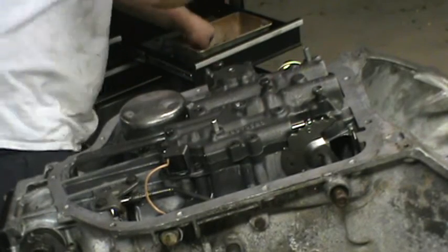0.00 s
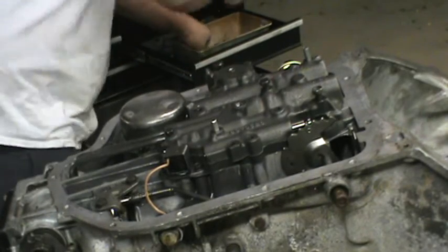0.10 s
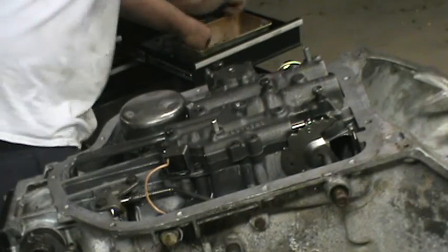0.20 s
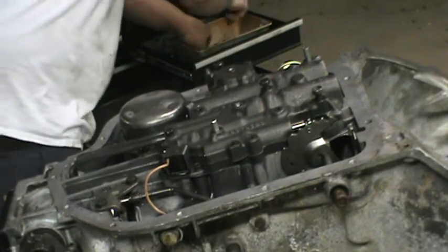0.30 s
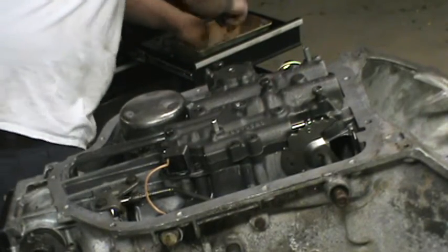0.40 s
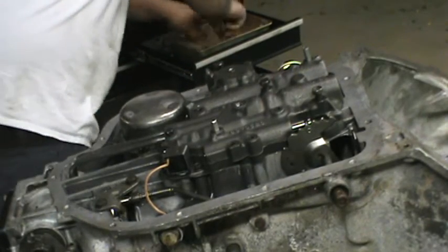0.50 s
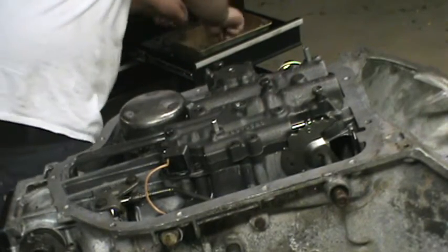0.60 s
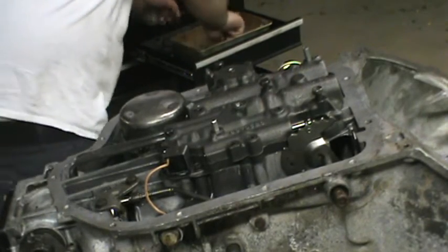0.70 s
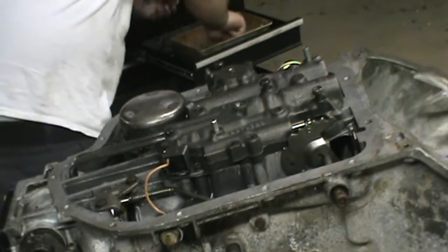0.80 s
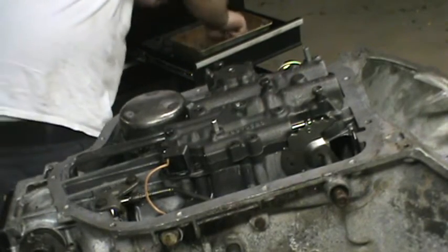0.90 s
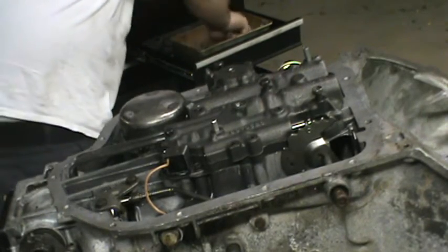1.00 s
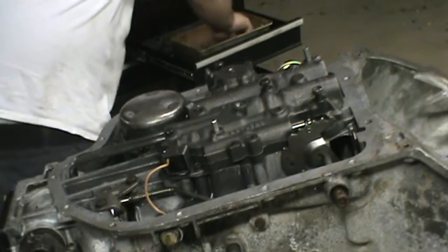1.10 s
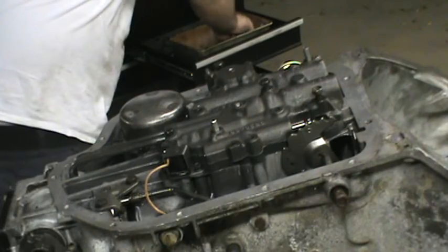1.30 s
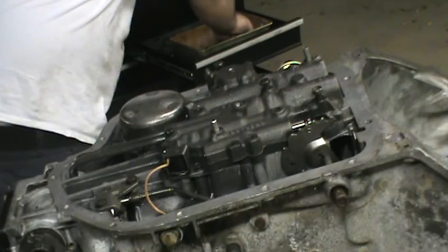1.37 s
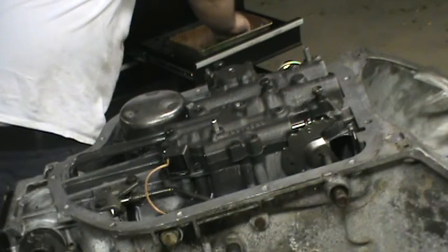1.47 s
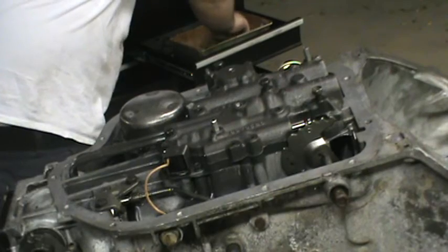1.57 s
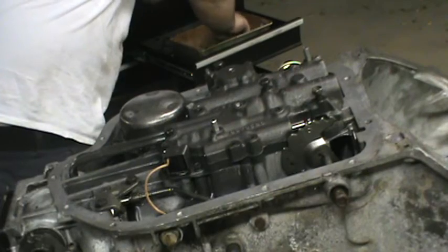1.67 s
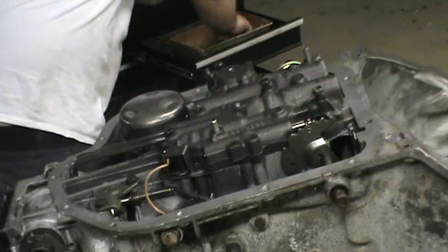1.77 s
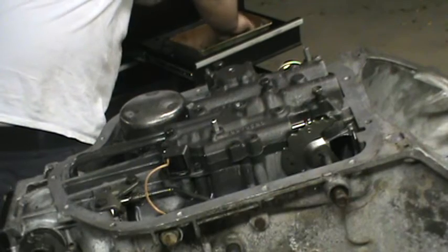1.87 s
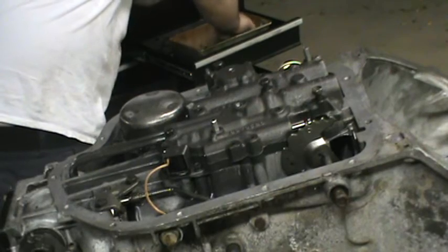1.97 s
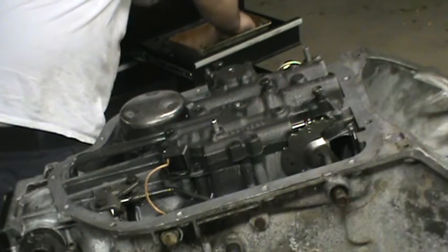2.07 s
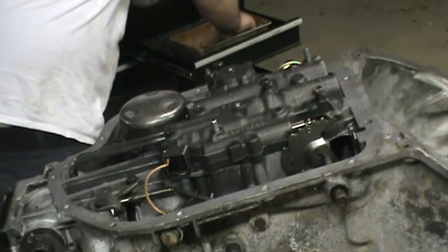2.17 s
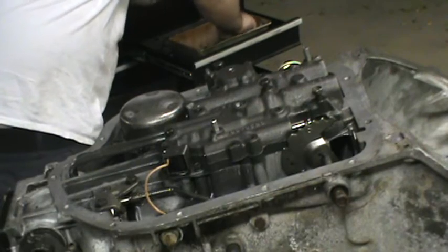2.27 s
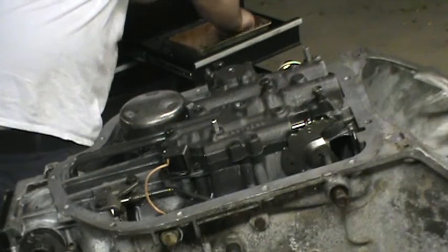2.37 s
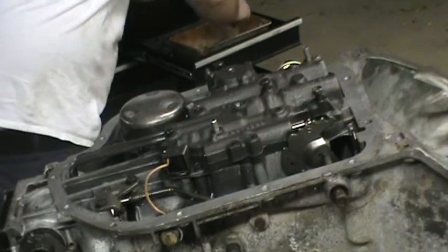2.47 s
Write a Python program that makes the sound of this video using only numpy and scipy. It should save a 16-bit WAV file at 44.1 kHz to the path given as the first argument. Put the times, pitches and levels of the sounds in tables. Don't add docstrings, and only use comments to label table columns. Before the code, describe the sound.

A hand stirs loose steel bolts in a shallow tray: uneven bursts of scraping, bright clinks and hollow floor knocks, with brief high rings, heard about two metres away in a small echoing workshop with faint hiss.

```python
import sys
import numpy as np
from scipy import signal
from scipy.fft import rfft, irfft
from scipy.io import wavfile
from scipy.ndimage import uniform_filter1d

SR = 44100
rng = np.random.default_rng(int(sys.argv[2]) if len(sys.argv) > 2 else 0)


def digitize_waveform(pressure):
    field = np.atleast_2d(pressure).T
    bounded = np.clip(field, -1, 1)
    quanta = np.round(bounded * 32767).astype(np.int16)
    wavfile.write(sys.argv[1], SR, quanta)


def natural_amplitude(level_db):
    exponent = np.asarray(level_db, float) / 20
    return 10 ** exponent


N = 112455

# mode_hz [Hz], level_db [dB], t60_s [s]
TRAY_MODES = [(320, -14, .06), (390, -4, .16), (603, -13, .1), (665, -3, .13), (770, -6, .1), (880, 0, .14),
              (968, -6, .1), (1030, -5, .1), (1180, -4, .11), (1295, -5, .1), (1460, -7, .09),
              (1590, -7, .09), (1800, -9, .06), (2200, -9, .07)]


def evened(x):
    return x / np.sqrt(np.mean(x ** 2) + 1e-20)


def read(points, hz):
    f, value = np.transpose(points)
    return np.interp(np.log(hz + 1), np.log(f + 1), value)


def add(mix, start_s, sound):
    part = mix[round(start_s * SR):][:len(sound)]
    part += sound[:len(part)]


def colour(x, points):
    size = x.shape[-1]
    gain = natural_amplitude(read(points, np.fft.rfftfreq(size, 1 / SR)))
    return irfft(rfft(x) * gain, size)


def band(x, lo_hz, hi_hz):
    sos = signal.butter(2, [lo_hz, hi_hz], "band", fs=SR, output="sos")
    return signal.sosfilt(sos, x)


def tray(hz, spread_db):
    focus_db = -8.5
    mode_hz, level_db, t60_s = np.transpose(TRAY_MODES)[:, :, None]
    t = np.arange(6000) / SR
    away_oct = abs(np.log2(mode_hz / hz))
    level_db = level_db + focus_db * (np.minimum(10 * away_oct, 1) + 0.28 * away_oct) + spread_db[:, None]
    modes = natural_amplitude(level_db - 60 * t / t60_s) * np.sin(2 * np.pi * mode_hz * t)
    return modes.sum(0)


def stir():
    # start_s [s], length_s [s], scrape_db [dB], tray_db [dB]
    strokes = [(0, 0.1, -60.5, -51.5), (0.214, 0.13, -56.5, -55.5), (0.321, 0.1, -50, -45.5),
               (0.423, 0.15, -63, -56), (0.668, 0.18, -46.5, -53), (0.839, 0.11, -46.5, -46),
               (0.958, 0.053, -52.5, -47), (1.043, 0.14, -52.5, -52.5), (1.217, 0.13, -54, -49.5),
               (1.35, 0.22, -64.5, -60.5), (1.563, 0.13, -60, -50.5), (1.647, 0.065, -54, -51),
               (1.726, 0.23, -55.5, -54), (1.864, 0.071, -46.5, -67), (1.964, 0.076, -53, -50.5),
               (2.055, 0.22, -63.5, -57.5), (2.172, 0.078, -45.5, -58), (2.227, 0.11, -54, -54)]
    # freq_hz [Hz], density_db [dB per Hz]
    scrape_spectrum = [(480, -10), (680, 1), (900, -6), (1140, -2.5), (3020, -7), (6740, -14),
                       (10300, -9.5), (15800, -19.5)]
    rise_s, fade_s, sag_db = 0.02, 0.026, -3.5
    grains_per_s, grain_spread_db, grain_t60_s = 5000, 2.5, 0.012
    drum_t60_s = 0.29

    t, power = np.arange(N) / SR, np.zeros((2, N))
    for start_s, length_s, scrape_db, tray_db in strokes:
        rise = np.clip((t - start_s) / rise_s, 0, 1)
        fade = np.exp(-np.maximum(t - start_s - length_s, 0) / fade_s)
        sag = natural_amplitude(sag_db * np.clip((t - start_s) / length_s, 0, 1))
        power += (rise * fade * sag * natural_amplitude(np.array([[scrape_db], [tray_db]]))) ** 2

    size = natural_amplitude(grain_spread_db * np.minimum(rng.exponential(1, (2, N)), 4))
    size = size * (rng.random((2, N)) < grains_per_s / SR)
    size = size * rng.standard_normal((2, N))

    grain = natural_amplitude(-60 * np.arange(400) / SR / grain_t60_s)
    envelope = np.sqrt(abs(signal.oaconvolve(size[0] ** 2, grain ** 2)[:N]))
    scrape = colour(envelope * rng.standard_normal(N), scrape_spectrum)
    scrape = band(scrape, 400, 17000) / np.std(band(scrape, 2500, 7000))

    body = tray(974, np.zeros(len(TRAY_MODES))) * natural_amplitude(-60 * np.arange(6000) / SR / drum_t60_s)
    hits = evened(size[1]) * np.sqrt(power[1])
    drum = signal.oaconvolve(hits, body / np.linalg.norm(body))[:N]
    return np.sqrt(power[0]) * scrape + band(drum, 260, 12000)


def air():
    # freq_hz [Hz], density_db [dB per Hz]
    air_spectrum = [(12, -6), (24, 5), (36, -2.5), (65, -0.5), (187, -4), (588, -4.5), (2810, -14),
                    (8600, -17), (15900, -17)]
    # freq_hz [Hz], likeness [-1..1]
    likeness = [(60, 1), (180, 0.74), (550, 0.037), (1650, 0.18), (4970, 0.49), (15000, 0.8)]
    # [dB, 1 dB below the sine's peak]
    whine_lines = [(15735, -74.5)]
    air_db = -55

    a, b = rfft(rng.standard_normal((2, N)))
    hz = np.fft.rfftfreq(N, 1 / SR)
    same = np.clip(read(likeness, hz), -1, 1)
    pair = np.array([a, same * a + np.sqrt(1 - same ** 2) * b])
    hiss = irfft(pair * natural_amplitude(read(air_spectrum, hz)), N)
    t = np.arange(N) / SR
    whine = sum(natural_amplitude(db + 1) * np.sin(2 * np.pi * f * t) for f, db in whine_lines)
    return natural_amplitude(air_db) * evened(hiss) + whine


def knocks():
    # start_s [s], peak_db [dB], pitch_hz [Hz], crack_db [dB], free_s [s]
    floor_knocks = [(0.026, -51, 880, 2, 0.038), (0.033, -42.5, 2200, -25, 0.02),
                    (0.25, -34, 890, -13, 0.02), (0.336, -36, 880, -11, 0.062),
                    (0.369, -27.5, 890, -2.5, 0.012), (0.387, -29, 1180, -30, 0.013),
                    (0.41, -34.5, 1030, -24, 0.0052), (0.506, -37.5, 880, -28, 0.025),
                    (0.662, -40, 880, -13, 0.011), (0.677, -31.5, 880, -24, 0.035),
                    (0.817, -30, 1180, 5, 0.017), (0.821, -30, 1030, -2, 0.015),
                    (0.833, -28, 968, -26, 0.013), (0.868, -31.5, 690, -15, 0.017),
                    (0.901, -34, 1000, -22, 0.01), (0.912, -34, 665, -13, 0.024),
                    (0.983, -35, 880, -20, 0.024), (1.119, -37, 1300, -8, 0.017),
                    (1.231, -49, 1300, -18, 0.015), (1.273, -31.5, 1800, -3, 0.023),
                    (1.298, -36, 900, -8, 0.0094), (1.591, -47.5, 880, 6, 0.027),
                    (1.624, -35.5, 1180, -8, 0.027), (1.625, -34.5, 880, 5, 0.017),
                    (1.637, -25.5, 665, -30, 0.0056), (1.664, -42, 665, -20, 0.025),
                    (1.761, -45.5, 880, -13, 0.02), (1.879, -49, 1590, -13, 0.0056),
                    (1.895, -21.5, 820, -1, 0.016), (1.897, -31.5, 1460, -23, 0.013),
                    (1.909, -29.5, 1180, -15, 0.01), (1.929, -31, 1295, -8, 0.0085),
                    (1.95, -34.5, 1460, -6, 0.014), (1.964, -36, 1200, -14, 0.0097),
                    (1.981, -41, 880, -15, 0.01), (1.998, -38.5, 1460, -10, 0.0093),
                    (1.187, -44.5, 880, -20, 0.022), (2.078, -36, 880, -9, 0.016),
                    (2.19, -38, 770, 5.5, 0.044), (2.271, -41.5, 880, 6, 0.016)]
    # start_s [s], peak_db [dB], free_s [s]
    thuds = [
        (.37, -50, .015),
        (0.681, -39, 0.029),
        (.818, -32, 0.0072),
        (.864, -32, 0.023),
        (0.987, -35.5, 0.014),
        (1.625, -29, 0.0193),
        (1.657, -35, 0.042),
        (1.709, -45, 0.039),
    ]
    bounce_db, bounce_s, bounces_per_s = -15, 0.005, 900
    choke_s, body_rise_s = 0.0022, 0.0015
    crack_t60_s, crack_rise_s = 0.11, 0.00017

    out, t = np.zeros(N), np.arange(6000) / SR
    blows = list(floor_knocks) + [(s, db, 390, -40, free_s) for s, db, free_s in thuds]
    for start_s, peak_db, pitch_hz, crack_db, free_s in blows:
        push = natural_amplitude(bounce_db) * rng.standard_normal(6000) * np.exp(-t / bounce_s)
        push = push * (rng.random(6000) < bounces_per_s / SR)
        push[0] = 1
        body = signal.fftconvolve(push, tray(pitch_hz, rng.standard_normal(len(TRAY_MODES))))[:6000]
        body = body * np.exp(-np.maximum(t - free_s, 0) / choke_s) * (1 - np.exp(-t / body_rise_s))

        noise = rng.standard_normal(6000)
        lumpy = np.convolve(noise, noise[-50:] * np.hanning(50) / 4.3)[:6000]
        crack = band(lumpy, 1120, 5900) * natural_amplitude(-60 * t / crack_t60_s) * (1 - np.exp(-t / crack_rise_s))
        add(out, start_s - .001, natural_amplitude(peak_db) * (body / abs(body).max() + natural_amplitude(crack_db) * crack))
    return band(out, 260, 12000)


def ticks():
    # start_s [s], peak_db [dB]
    bolt_ticks = [(0.0752, -33.5), (0.22, -38), (0.25, -30.5), (0.255, -36), (0.553, -46), (0.3314, -23),
                  (0.3694, -46), (0.6954, -19), (0.766, -25), (0.7744, -27), (0.666, -31.5), (1.836, -31),
                  (0.816, -13), (0.917, -24.5), (0.9278, -32), (0.9787, -37), (1.0715, -23), (1.162, -30),
                  (1.187, -29.5), (1.59, -30), (1.622, -24.5), (1.653, -26), (1.7225, -35), (1.746, -27),
                  (1.7993, -28.5), (1.8934, -16.5), (2.062, -30), (2.0762, -27), (2.158, -28.5),
                  (2.1973, -19), (2.266, -25.5)]
    snap_t60_s, ring_t60_s, ring_db, trim_db = 0.035, 0.012, -8, -10

    out, t = np.zeros(N), np.arange(3000) / SR
    for start_s, peak_db in bolt_ticks:
        snap = band(rng.standard_normal(3000), 7450, 12640) * natural_amplitude(-60 * t / snap_t60_s)
        ring_hz = rng.uniform(9660, 10660, (2, 1))
        ring = natural_amplitude(ring_db - 60 * t / ring_t60_s) * np.sin(2 * np.pi * ring_hz * t).sum(0)
        add(out, start_s, natural_amplitude(peak_db + trim_db) * (snap + ring))
    return out


def rings():
    # start_s [s], bolt [letter], level_db [dB], t60_s [s], free_s [s until touched]
    free_rings = [(0.0755, "b", -43.5, 0.23, .17), (.249, "e", -14.5, 0.064, 0.032),
                  (0.255, "d", -44, 0.083, .05), (.272, "e", -37.5, 0.99, 0.08),
                  (.334, "d", -36, 0.051, .02), (.342, "e", -49, 0.34, 0.025),
                  (.386, "c", -46.5, 0.34, .04), (.43, "c", -61.5, 0.68, 0.08),
                  (0.407, "e", -58, 0.27, 0.051), (0.552, "d", -50.5, 0.16, 0.02),
                  (.553, "e", -56, 0.13, 0.03), (.696, "a", -32.5, .6, 0.073),
                  (0.726, "e", -36, 0.3, 0.037), (0.725, "d", -40, 0.3, 0.028),
                  (.772, "a", -39.5, 0.13, 0.017), (0.929, "f", -22, 0.04, 0.0076),
                  (0.932, "f", -39.5, 0.22, 0.039), (0.978, "g", -18.5, 0.015, 0.0078),
                  (.99, "f", -54, 0.61, 0.077), (1.07, "g", -28.5, 0.018, .01),
                  (1.074, "a", -44, 0.33, 0.0097), (1.085, "a", -26.5, 0.14, 0.026),
                  (1.112, "a", -32.5, 0.073, 0.018), (1.135, "a", -55, .3, 0.021),
                  (1.172, "a", -51.5, .4, 0.059), (1.656, "a", -38.5, 0.071, 0.035),
                  (1.721, "a", -63, 0.27, .02), (1.849, "a", -50, 0.18, 0.022),
                  (2.264, "g", -35, .04, .015), (2.266, "h", -34, .04, .015)]
    bolt_hz = dict(a=8700, b=8950, c=9330, d=9545, e=9862, f=9916, g=10280, h=11300)
    rise_s, touch_s = 0.002, 0.003
    pair_hz, pair_db = 45, -12
    wobble_db, wobble_grows_s, wander_rad = 3.2, 0.03, 0.5
    halo_db, halo_t60_s = -15, 0.1

    out, t = np.zeros(N), np.arange(9000) / SR
    for start_s, bolt, level_db, t60_s, free_s in free_rings:
        hz = bolt_hz[bolt]
        shake = rng.standard_normal(9000)
        slow = evened(uniform_filter1d(uniform_filter1d(shake, size=150), size=60))
        phase = 2 * np.pi * hz * t + wander_rad * slow[::-1]
        pair = np.sin(phase) + natural_amplitude(pair_db) * np.sin(phase + 2 * np.pi * (pair_hz * t + rng.random()))
        waver = natural_amplitude(wobble_db * np.minimum(t / wobble_grows_s, 1) * slow)
        touched = np.exp(-np.maximum(t - free_s, 0) / touch_s)
        shape = (1 - np.exp(-t / rise_s)) * natural_amplitude(level_db - 60 * t / t60_s) * touched
        halo = natural_amplitude(level_db + halo_db - 60 * t / min(halo_t60_s, t60_s))
        halo = halo * evened(band(shake, .9 * hz, 1.03 * hz))
        add(out, start_s, shape * waver * pair + halo)
    return out


def shop(x):
    # freq_hz [Hz], t60_s [s]
    decay = [(300, 0.14), (1000, 0.23), (4000, 0.23), (12000, 0.11)]
    # freq_hz [Hz], level_db [dB]
    ahead = [(300, -8), (1000, -10), (4000, -5), (12000, -8)]
    # freq_hz [Hz], level_db [dB]
    sides = [(300, -28), (700, -19.5), (1500, -7.5), (5000, -6), (9000, -6.5), (15000, -19.5)]
    swaps_per_s = 9

    out, turn = np.zeros((2, N)), np.arange(N) / SR * swaps_per_s
    for k in range(3):
        taps = np.zeros((2, SR // 2))
        at = np.arange(200, SR // 2 - 20, 20)
        at = at + rng.integers(0, 20, (2, len(at)))
        np.put_along_axis(taps, at, rng.choice([-1., 1.], at.shape), 1)

        hz, t, z = signal.stft(taps, SR, nperseg=256)
        z = z * natural_amplitude(-60 * t / read(decay, hz)[:, None])
        z = z / np.sqrt((abs(z) ** 2).sum(2, keepdims=True))
        z = z * natural_amplitude(np.array([read(ahead, hz), read(sides, hz)]))[..., None]
        tail = signal.istft(z, SR, nperseg=256)[1] / 140

        share = np.sqrt(2 / 3) * np.cos(np.pi * (turn + k / 3))
        out += signal.fftconvolve((share * x)[None], tail, axes=1)[:, :N]
    return np.array([out[0] + out[1], out[0] - out[1]])


def scene():
    left_db, right_db = 0.46, 1.5
    bolts = knocks() + ticks() + stir()
    free = rings()
    direct = (bolts + free) * natural_amplitude(np.array([[left_db - .5], [right_db - .5]]))
    return direct + shop(bolts + 0.54 * free) + air()


def roll_off(x):
    return signal.sosfilt(signal.butter(12, 16620, fs=SR, output="sos"), x)


def record(dry):
    top = signal.firwin(301, 15950, fs=SR)
    mix = signal.oaconvolve(dry, top[None], "same", axes=1)
    return roll_off(mix)


dry = scene()
out = record(dry)
digitize_waveform(out)
```